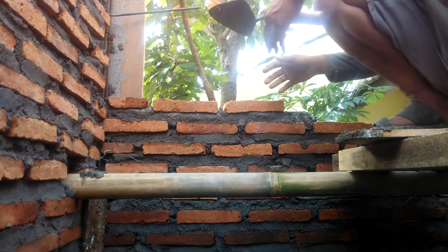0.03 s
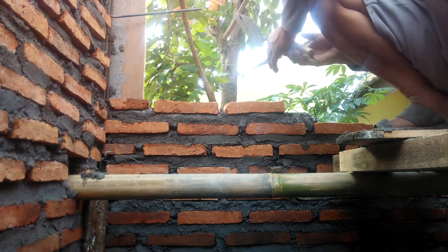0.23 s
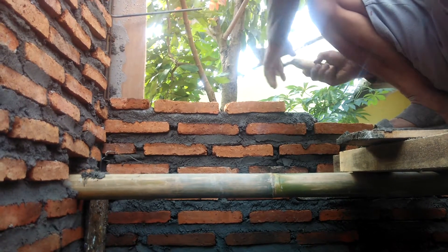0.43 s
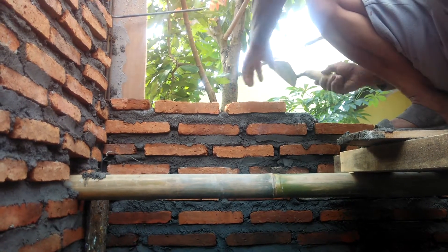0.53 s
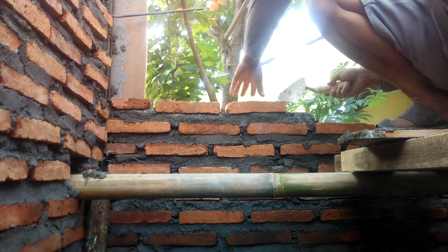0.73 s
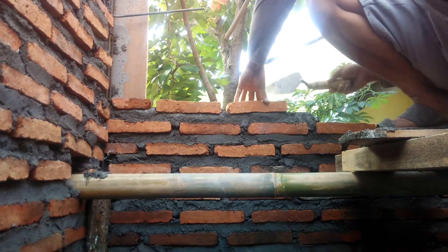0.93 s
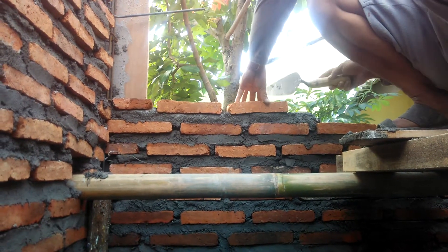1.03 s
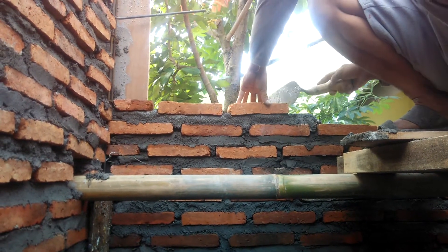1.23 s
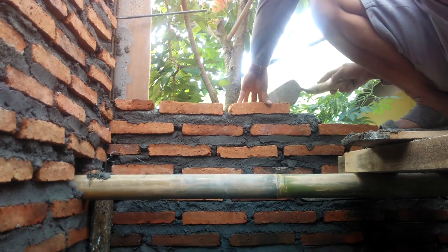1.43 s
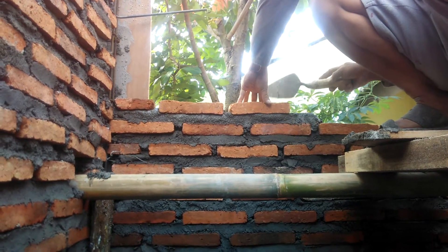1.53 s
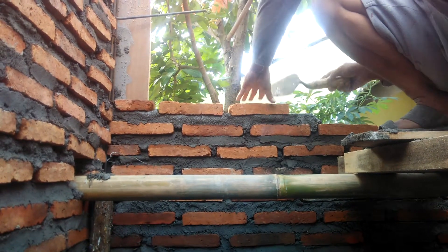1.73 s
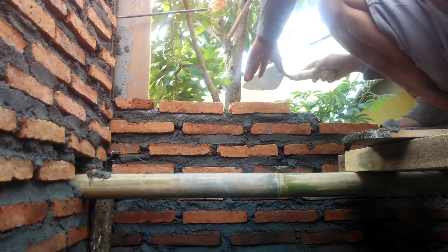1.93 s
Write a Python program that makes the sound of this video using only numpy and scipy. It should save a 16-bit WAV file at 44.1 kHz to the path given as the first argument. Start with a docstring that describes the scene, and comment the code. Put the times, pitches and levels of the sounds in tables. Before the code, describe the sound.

A steel trowel scrapes gritty mortar, then taps a brick three times with sharp, ringing knocks

```python
"""Bricklayer's trowel

A bricklayer scrapes gritty mortar with a steel trowel and taps a brick three times to bed it, scraping
on between the taps. Sand grains are random clicks, filtered to a bright hiss and a low rasp, that also
drive the blade's resonances. Each tap sums decaying modes of brick and blade with bursts of noise.
The half-built brick walls add a quick echo and a short noise-like tail; faint outdoor hiss and an insect
trill run beneath."""
import sys
import numpy as np
from scipy import signal
from scipy.fft import rfft, irfft
from scipy.io import wavfile

SR = 44100
rng = np.random.default_rng(int(sys.argv[2]) if len(sys.argv) > 2 else 0)


def wrap_up_sound(samples):
    """Save the sound to the file named by the first command line argument, as 16-bit audio."""
    columns = np.atleast_2d(samples).T
    # keep every value between -1 and 1, then stretch to whole-number steps
    tamed = np.clip(columns, -1, 1)
    steps = np.round(tamed * 32767).astype(np.int16)
    wavfile.write(sys.argv[1], SR, steps)


N = 88200
T = np.arange(N) / SR  # time [s]
FREQUENCY = np.arange(N // 2 + 1) * SR / N + 1  # [Hz], raised by 1 Hz so that its logarithm exists


def undb(db):
    """Decibel scale: level to amplitude gain."""
    return 10 ** (np.asarray(db) / 20)


def fade(t60):
    """Exponential damping: the level falls 60 dB in t60 seconds."""
    return undb(-60 * T / t60)


def gains(points):
    """Frequency response: levels in dB joined by straight lines over log frequency."""
    hz, db = np.array(points, float).T
    return undb(np.interp(np.log(FREQUENCY), np.log(hz), db))


def colour(x, points):
    """Linear filtering: shape the spectrum, keeping the power of white noise."""
    response = gains(points)
    response = response / np.sqrt(np.mean(response ** 2))
    return irfft(rfft(x) * response, N)


def noise():
    """White noise: equal power at all frequencies, unit power in all."""
    return rng.standard_normal(N)


def delay(x, seconds):
    """Propagation delay: the same sound later."""
    return np.concatenate([np.zeros(int(seconds * SR)), x])[:N]


def walk(rate):
    """Random modulation: straight lines between independent values, rate of them a second."""
    return np.interp(T * rate, np.arange(N), noise())


def grit():
    """Shot noise: dense sand-grain clicks of random sign and uneven size, at unit power."""
    grains_per_s, spread_db = 9000, 1
    clicks = (rng.random(N) < grains_per_s / SR) * np.sign(noise())
    size = undb(spread_db * np.minimum(rng.exponential(size=N), 4))
    x = clicks * size
    return x / np.std(x)


def ring(modes):
    """Modal superposition: struck modes, each dying at its own rate."""
    total = np.zeros(N)
    for hz, db, t60 in modes:
        sign = rng.choice([-1, 1])
        total += sign * undb(db) * fade(t60) * np.sin(2 * np.pi * hz * T)
    return total


def shimmer(x):
    """Moving contact: each half-octave band flickers on its own as the contact point shifts."""
    depth_db, values_per_s = 2.5, 45.12
    half_octave, spectrum = 2 * np.log2(FREQUENCY), rfft(x)
    total = np.zeros(N)
    for centre in range(10, 30):
        # overlapping triangular bands
        weight = np.maximum(1 - np.abs(half_octave - centre), 0)
        total += irfft(spectrum * weight, N) * undb(depth_db * walk(values_per_s))
    return total


def scraping():
    """Friction excitation: the juddering blade drags sand, which hisses, rasps and makes the steel sing."""
    # scraping strokes, one curve each: (time [s], grit hiss level [dB], low rasp level [dB])
    strokes = [
        [(0.0, -79, -98), (0.03, -72.5, -83), (0.085, -68.5, -72), (0.105, -58.5, -70), (0.135, -61, -66),
         (0.152, -75, -93)],
        [(0.152, -60, -65), (0.162, -54, -62), (0.208, -50.5, -60), (0.232, -33.5, -49.5),
         (0.285, -32.5, -43.5), (0.328, -35.5, -49), (0.364, -50, -60), (0.43, -45.5, -56), (0.566, -53.5, -64)],
        [(0.566, -53.5, -60), (0.59, -48, -58.5), (0.63, -43.5, -54.5), (0.74, -41, -54.5),
         (0.768, -44.5, -53.5), (0.812, -59, -69.5), (0.885, -60.5, -68)],
        [(0.885, -59, -65.5), (0.91, -54, -59), (0.98, -54, -58.5), (1.034, -44.5, -52), (1.1, -59, -69.5),
         (1.118, -67.5, -91), (1.18, -112, -93)],
        [(1.38, -56, -72), (1.446, -59.5, -59.5), (1.466, -47, -72), (1.494, -39, -55), (1.525, -42.5, -61.5),
         (1.55, -50, -59), (1.63, -54, -66), (1.66, -67, -103)],
        [(1.66, -62, -75), (1.72, -58, -60.5), (1.8, -64.5, -101), (1.88, -84, -114), (1.945, -71.5, -99),
         (1.985, -71.5, -105), (2.0, -61, -64)],
    ]
    # colour of sand sliding on steel: (frequency [Hz], relative level [dB per Hz])
    sand_colour = [(300, -70), (2000, -34), (3900, -10), (4500, -11.5), (6000, -6), (7700, -1.5), (8500, 3),
                   (9400, -1.5), (10500, -7), (12000, -14), (14300, -19.5)]
    # colour of mortar dragged over brick: (frequency [Hz], relative level [dB per Hz])
    rasp_colour = [(60, -22), (160, -23), (300, -19.5), (385, -2), (470, -9), (580, 2), (1050, -2.5),
                   (1450, 3.5), (1800, -2.5), (2600, 4.5), (3400, 2), (4000, -2.5), (6000, -7)]
    # colour of the fine grit that drives the blade: (frequency [Hz], relative level [dB per Hz])
    drive_colour = [(500, -38), (3500, -0.5), (14000, 2)]
    # high blade resonances, damped by mortar: (frequency [Hz], relative level [dB], t60 [s])
    sing_modes = [(4375, -4, 0.06), (4750, -2, 0.084), (5160, 3, 0.013), (6180, 3.5, 0.014),
                  (6660, -1.5, 0.11), (7440, -1.5, 0.11), (8700, -2, 0.012), (9000, -6.5, .025),
                  (10260, -13.5, 0.034)]
    sing_db = -13
    judder_values_per_s, judder_db = 168.2, 0.4

    s, hiss_db, rasp_db = np.vstack(strokes).T
    s = np.maximum.accumulate(s)
    pressure = undb(np.interp(T, s, hiss_db))
    hiss = colour(grit(), sand_colour) * pressure
    rasp = colour(grit(), rasp_colour) * undb(np.interp(T, s, rasp_db))

    blade = ring(sing_modes)
    blade = blade / np.sqrt(np.sum(blade ** 2))
    drive = colour(grit(), drive_colour) * pressure
    sing = undb(sing_db) * signal.fftconvolve(drive, blade)[:N]

    judder = undb(judder_db * walk(judder_values_per_s))
    return shimmer(hiss + rasp + sing) * judder


def outdoors():
    """Ambient noise: a faint wavering hiss with a distant insect trill in the trees."""
    # outdoor background: (frequency [Hz], relative level [dB per Hz])
    air_colour = [(25, 3), (70, -8.5), (170, 0), (300, 4), (450, -7), (700, -2), (1100, 0.5), (1800, -6),
                  (3000, -2.5), (4500, -7.5), (7700, -1.5), (10000, -14.5), (14000, -24)]
    # insect trill: (frequency [Hz], relative level [dB per Hz])
    insect_colour = [(6000, -51), (7300, -17), (7650, 1), (7850, -3.5), (8100, -16), (9500, -60)]
    air_db = -72 + walk(6.5)
    insects_db = -79.5 + 2 * walk(21)
    air = undb(air_db) * colour(noise(), air_colour)
    insects = undb(insects_db) * colour(noise(), insect_colour)
    return air + insects


def bumps():
    """Amplitude modulation: dull swells of low noise under bell-shaped envelopes."""
    # soft low bumps: (time of peak [s], level [dB], standard deviation of the bell [s])
    swells = [(0.027, -77.5, .02), (0.12, -73, 0.014), (0.27, -78, 0.065), (1.785, -72, 0.025)]
    # their colour: (frequency [Hz], relative level [dB per Hz])
    low_colour = [(30, -33), (60, 3), (90, -4.5), (150, 5.5), (200, -12), (280, -26), (800, -27)]
    envelope = sum(undb(db) * np.exp(-((T - s) / length) ** 2 / 2) for s, db, length in swells)
    return colour(noise(), low_colour) * envelope


def touches():
    """Transient friction: small gritty ticks that decay after the blade grazes the mortar."""
    # light touches of the blade on grit: (time [s], level [dB])
    grazes = [(0.408, -59), (1.335, -52), (1.417, -46), (1.664, -50), (1.943, -65.5)]
    # their colour: (frequency [Hz], relative level [dB per Hz])
    tick_colour = [(500, -23), (1800, -5.5), (3000, 1.5), (6000, 1.5), (8500, 7), (13000, -16)]
    t60 = 0.1  # [s]
    total = np.zeros(N)
    for s, db in grazes:
        tick = colour(grit(), tick_colour) * fade(t60)
        total += delay(undb(db) * tick, s)
    return total


def tap(brick_db, favoured_hz, blade_db, zing_db, crack_db, length):
    """Impact excitation: a crack, the knock coloured by the spot struck, the blade's ring and edge's zing."""
    # brick on its mortar bed: (frequency [Hz], level before the favouring [dB], t60 [s])
    brick_modes = [(163.3, -23, 0.26), (262.6, -7.5, 0.075), (343.3, -5.5, 0.067), (422, -15.5, 0.2),
                   (577, -17, 0.22), (746, -5.5, 0.058), (833, -9.5, 0.073), (949, -1, 0.029),
                   (1024, -6.5, 0.045), (1114, -2, 0.026), (1370, 1, 0.03), (1430, -3.5, 0.034)]
    # steel blade: (frequency [Hz], relative level [dB], t60 before the length factor [s])
    blade_modes = [(1572, -3.5, 0.32), (1614, -5, 0.17), (1658, -0.5, 0.11), (2105, -3, .15),
                   (2662, -6, 0.17), (3062, 7, 0.058), (4250, 1.5, 0.077), (4290, -2, 0.11),
                   (4985, -2, 0.067), (5560, 4, 0.034), (5980, -27, .12), (6360, -8, .08)]
    # short bright zing of the blade's edge: (frequency [Hz], relative level [dB per Hz])
    zing_colour = [(6500, -31), (7700, -10.5), (8300, -10), (8620, 9.5), (9000, -3), (9700, -11),
                   (11500, -36)]
    # crack of the contact: (frequency [Hz], relative level [dB per Hz])
    crack_colour = [(40, -14), (130, -36), (260, 2), (500, 1), (950, -3), (1400, -2.5), (1800, -2.5),
                    (2200, 6.5), (2600, -0.5), (3300, 0), (3800, 0.5), (5400, 1), (7500, -2), (9500, -2.5),
                    (12000, -12), (14500, -12.5)]
    favour_db, favour_octaves = 6.5, 0.33
    zing_t60, crack_t60, crack_tail_t60 = 0.042, 0.074, 0.15  # [s]
    crack_tail_db = -7
    contact_s = 0.00082  # time over which the blade bites into the brick
    low_cut_hz = 173

    favoured_modes = []
    for hz, db, t60 in brick_modes:
        octaves_away = np.log2(hz / favoured_hz)
        boost_db = favour_db * np.exp(-(octaves_away / favour_octaves) ** 2)
        favoured_modes.append((hz, db + boost_db, t60))
    brick = ring(favoured_modes)
    blade = ring([(hz, db, t60 * length) for hz, db, t60 in blade_modes])
    zing = colour(noise(), zing_colour) * fade(zing_t60)
    crack_decay = fade(crack_t60) + undb(crack_tail_db) * fade(crack_tail_t60)
    crack = colour(noise(), crack_colour) * crack_decay

    blow = undb(brick_db) * brick + undb(blade_db) * blade
    blow += undb(zing_db) * zing + undb(crack_db) * crack
    blow = blow * np.minimum(T / contact_s, 1)
    low_cut = signal.butter(2, low_cut_hz, "high", fs=SR, output="sos")
    return signal.sosfilt(low_cut, blow)


def echo(x):
    """Specular reflection: one quick, weaker copy from the brick walls."""
    return undb(-14.5) * delay(x, 0.011)


def walls(x):
    """Diffuse reverberation: convolution with decaying noise gives the walls' short tail."""
    level_db, t60, gap_s = -8.5, 0.25, 0.006
    tail = delay(noise() * fade(t60), gap_s)
    tail = tail / np.sqrt(np.sum(tail ** 2))
    return undb(level_db) * signal.fftconvolve(x, tail)[:N]


def diffuse(taps):
    """Incoherent field: grit, background and wall tail, drawn afresh at every call."""
    return scraping() + outdoors() + touches() + walls(taps)


def scene():
    """Mid-side stereo: taps, echo and bumps sit in the centre; mainly the diffuse treble spreads wide."""
    # taps on the brick: (time [s], brick level [dB], favoured pitch [Hz], blade ring level [dB],
    # edge zing level [dB], crack level [dB], blade ring length [factor])
    blows = [(1.3435, -34, 950, -41.5, -37, -36.5, 0.96), (1.5540, -32.5, 750, -43, -22, -33.5, 0.67),
             (1.7265, -34.5, 730, -46, -47, -38, 0.53)]
    # stereo width: (frequency [Hz], side minus mid level of the diffuse part [dB])
    width = [(100, -67), (3700, -53), (4300, -47), (6200, -12.5), (9000, -5), (14000, -4.5)]
    taps = sum(delay(tap(*settings), s) for s, *settings in blows)
    mid = taps + echo(taps) + bumps() + diffuse(taps)
    side = irfft(rfft(diffuse(taps)) * gains(width), N)
    return np.array([mid + side, mid - side])


def record(dry):
    """Microphone response: a narrow dip in the treble, then a steep low-pass that cuts the top."""
    notch_hz, notch_q, top_hz = 3960, 26.6, 14300
    b, a = signal.iirnotch(notch_hz, notch_q, fs=SR)
    dipped = signal.lfilter(b, a, dry)
    # tenth order, 0.2 dB passband ripple, 70 dB stopband attenuation
    low_pass = signal.ellip(10, 0.2, 70, top_hz, fs=SR, output="sos")
    return signal.sosfilt(low_pass, dipped)


dry = scene()
out = record(dry)
wrap_up_sound(out)
```